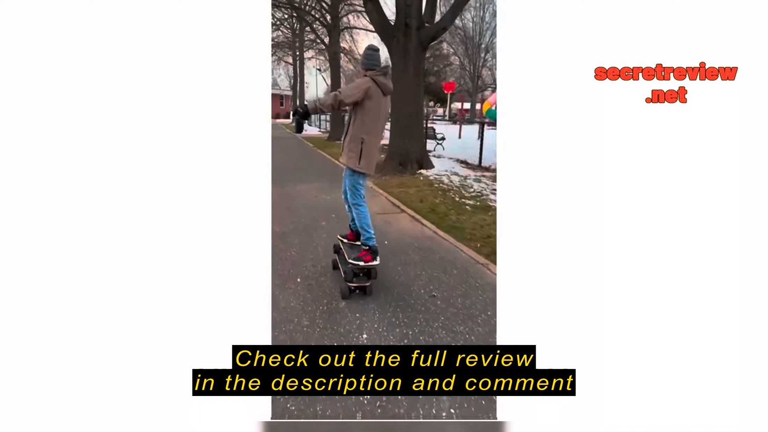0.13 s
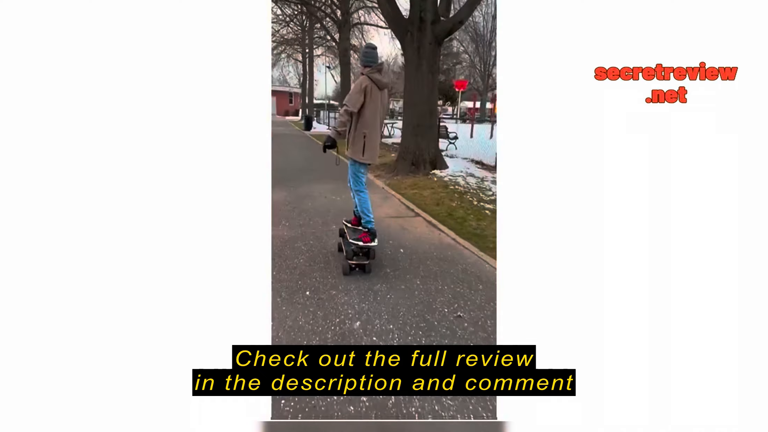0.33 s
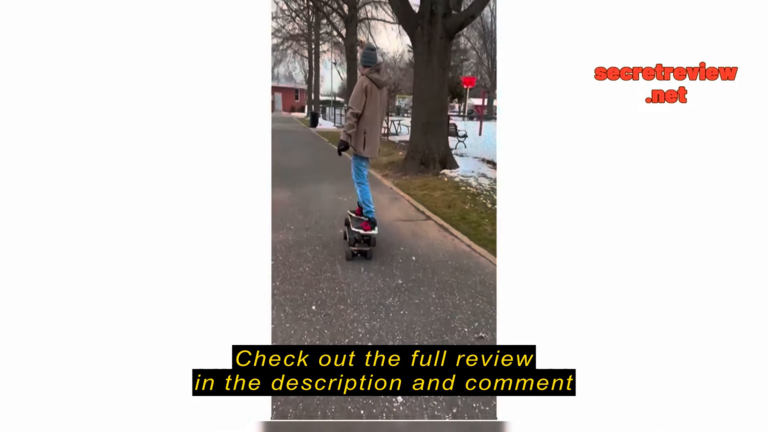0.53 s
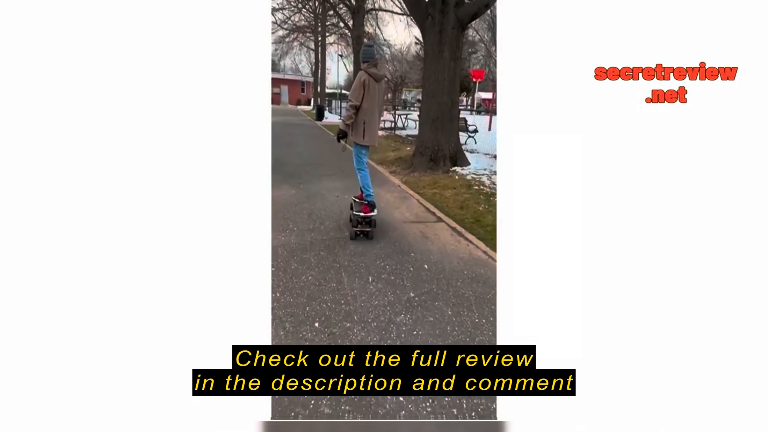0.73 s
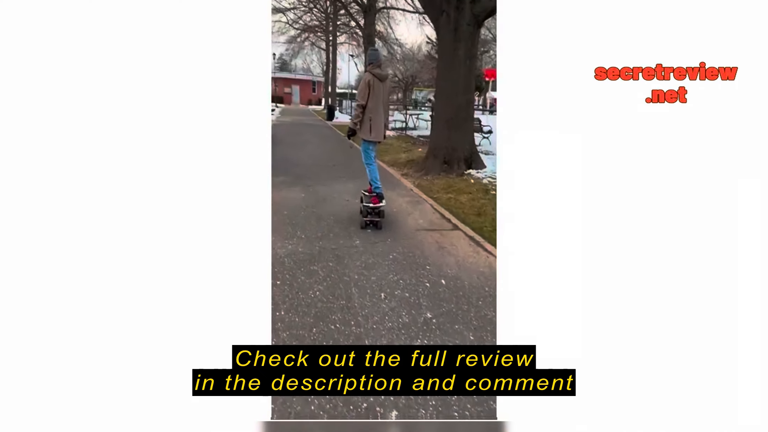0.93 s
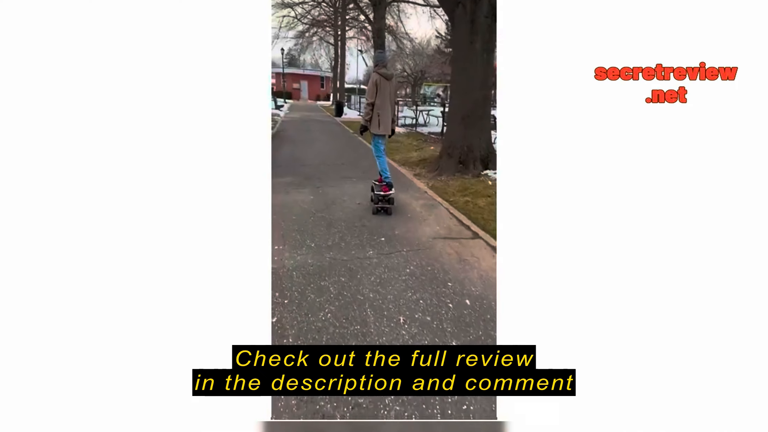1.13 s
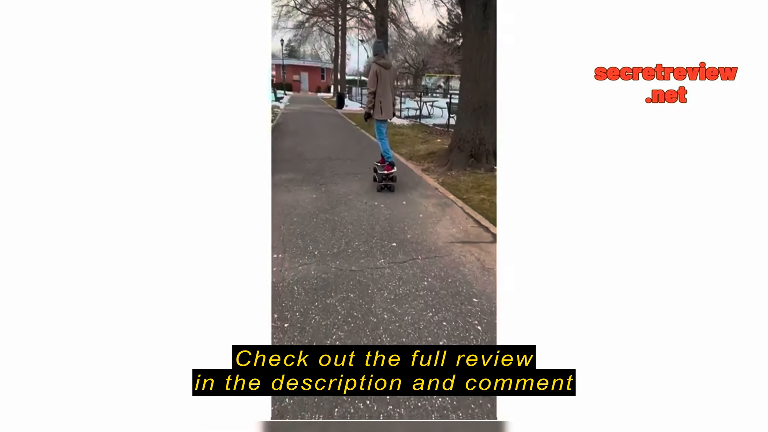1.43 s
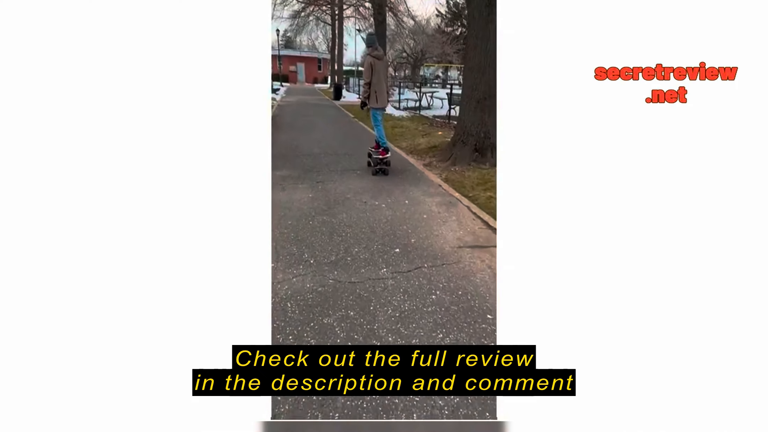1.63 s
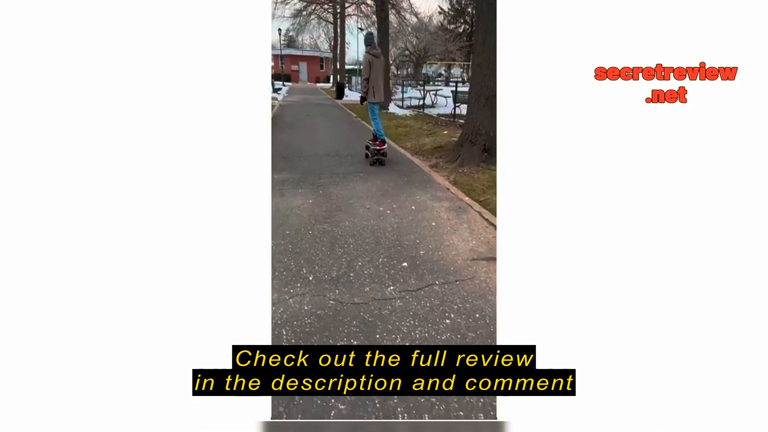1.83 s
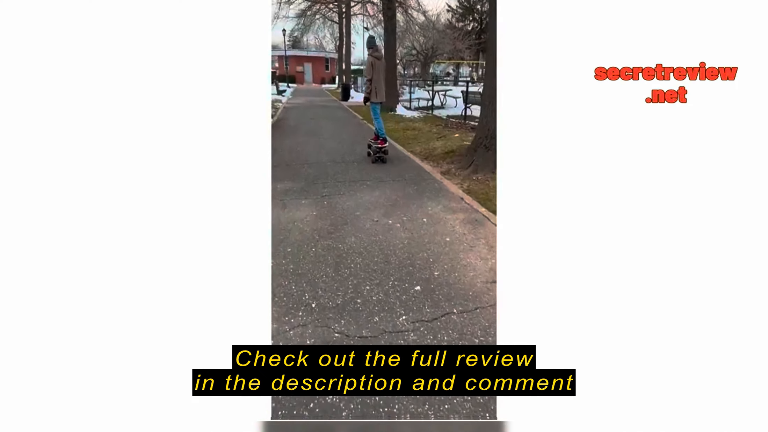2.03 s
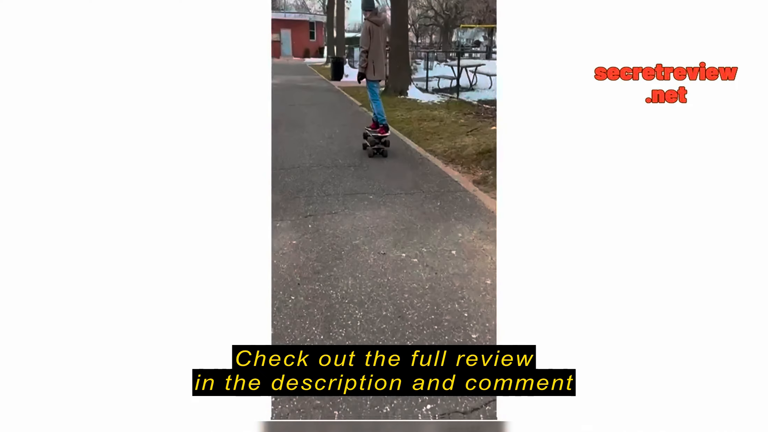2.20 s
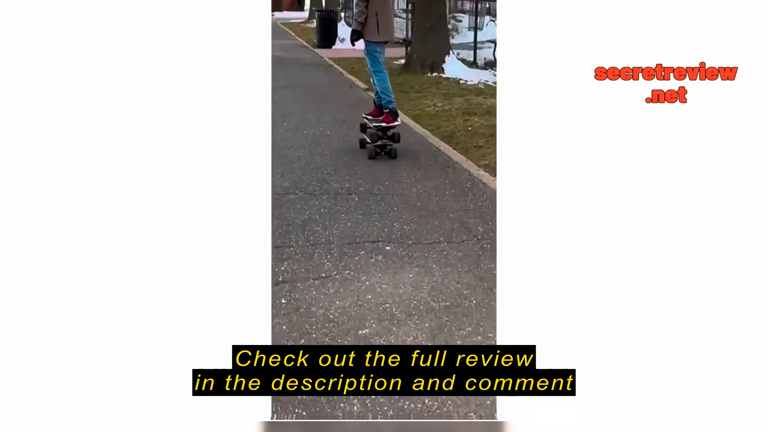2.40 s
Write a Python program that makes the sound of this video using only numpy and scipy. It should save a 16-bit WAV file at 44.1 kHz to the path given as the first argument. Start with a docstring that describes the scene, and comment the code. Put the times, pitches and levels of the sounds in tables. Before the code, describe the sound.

Skateboard wheels rumble over gritty pavement under gusty microphone wind, with small clicks and hollow deck knocks

```python
"""Wind buffets two microphone ports throughout, strongest early on, over thin hiss and a skateboard's roar.
The board rolls on a paved park path: noisy bumps excite deck resonances, a dull drone on the left.
Grit ticks nearby, each grain a noise snap with a short ping, and the deck gives brief hollow knocks.
Later a heel crunches on the grit, noise puffs with ringing tones, and scuffs in swelling bands of noise."""
import sys
import numpy as np
from scipy import signal
from scipy.fft import rfft, irfft, next_fast_len
from scipy.io import wavfile

SR = 44100
rng = np.random.default_rng(int(sys.argv[2]) if len(sys.argv) > 2 else 0)


def generate_wav(signal):
    """Clip the signal to [-1, 1] and save it as 16-bit WAV at the path in sys.argv[1]."""
    frames = np.transpose(np.atleast_2d(signal))
    scaled = np.clip(frames, -1, 1) * 32767
    pcm = np.round(scaled).astype(np.int16)
    wavfile.write(sys.argv[1], SR, pcm)


N = 112896   # 2.56 s

# wind pressure on the ports: start_s, common_level_db, common_upper_db (relative to its low part),
# common_deep_db (likewise), opposed_db (relative to common), opposed_upper_db (relative to its low part)
WIND = [(0.0, -36, -1, -12, 2.5, -8), (0.22, -26.5, -7.5, -26, -20.5, 4), (0.28, -31, -2.5, -32, -15, 1.5),
        (0.39, -32.5, -7, -15, -22, 2), (0.42, -34.5, -0.5, -19, -18, 1), (0.45, -34, -3.5, -5, -13, 1),
        (0.54, -34, -6, -16, -7.5, -9), (0.61, -35, -7.5, 5, -31, 11), (0.69, -35.5, -3.5, -43, -9.5, -2),
        (0.81, -32, -7.5, -19, -0.5, -13), (0.9, -40, 3.5, 1.5, -0.5, -5),
        (1.01, -41, -4.5, -6.5, 12, -4.5), (1.04, -38.5, -10, -12, 8, -1), (1.08, -42.5, -36, -6, 15.5, -5),
        (1.13, -31.5, -3.5, -7.5, -7, -6), (1.2, -45, -7, -1, -10, -13), (1.85, -42.5, -4, -1.5, -1, -5),
        (2.05, -54.5, -8, -11, 12.5, 1.5), (2.08, -40, -12.5, -30, 3, -6), (2.12, -40, -6, -10, 1, -3),
        (2.33, -37, -8.5, -11, -6, -12), (2.47, -36.5, -25, -13, 0, -6), (2.5, -41.5, -11, -12, 14, -19),
        (2.56, -36.5, -7, 5, -1, -7)]
# spectra of the wind's low, upper common, upper opposed and deepest parts: frequency_hz, density_db
WIND_LOW = [(70, -15), (100, -4), (150, 1.5), (220, 0.5), (300, -10.5), (400, -39)]
WIND_HIGH = [(160, -34), (270, -2), (387, 0), (427, -10.5), (553, -9.5), (586, -16), (621, -31), (701, -43),
             (863, -15.5), (1020, -21.5), (1260, -37), (1500, -30), (1950, -53), (3300, -120)]
OPPOSED_HIGH = [(160, -32), (270, -5), (400, -3.5), (600, -2), (800, -16), (1000, -15), (1250, -32),
                (1950, -57), (3300, -120)]
WIND_DEEP = [(18, -43), (30, -24), (50, 4.5), (75, 6), (100, -4), (140, -34)]
# deepest opposed pressure, added on its own: start_s, level_db
DEEP_OPPOSED = [(0, -41), (.2, -45), (.4, -39), (.56, -63), (.72, -39), (.9, -36), (1.1, -51), (1.4, -37),
                (1.68, -47), (1.84, -39), (2.0, -45), (2.3, -40), (2.5, -27), (2.56, -30)]
# single pushes of wind: centre_s, level_db, pitch_hz
THUMPS = [(0.174, -13.5, 170), (0.2146, -16, 206), (0.311, -19, 131), (0.388, -13, 135), (1.04, -28, 118),
          (1.116, -24, 102), (1.127, -28, 700), (1.1277, -23.5, 368), (1.1304, -21, 332),
          (1.575, -27, 71.7), (1.708, -28.5, 86.5), (1.931, -28, 153), (2.08, -28, 220)]
# low buffeting note, the same at both ports: start_s, pitch_hz, level_db
BUFFET = [(0, 149, -47), (.1, 166.3, -34.5), (.2, 190.3, -41), (.27, 139.9, -31.5), (.34, 127.4, -27),
          (.47, 131.3, -30.5), (.6, 115.2, -32.5), (.73, 109.1, -38.5), (.83, 136.5, -29),
          (.95, 132.1, -69), (1.04, 109.6, -36.5), (1.13, 103, -29.5), (1.22, 110, -47),
          (2.2, 148.6, -44.5), (2.4, 110.9, -37.5), (2.56, 96.6, -36)]
WIND_LUMP_DB, WIND_LUMP_HZ = 2, 20.0
THUMP_CYCLES = 1   # envelope scale, in cycles of the push
BUFFET_DRIFT_HZ = 11

# fine grit and air hiss: start_s, level_db, common_middle_db and opposed_middle_db (extra near 3 kHz)
HISS = [(0.0, -45.5, 1, 3), (0.43, -52, 0.6, 1), (0.57, -51, 2, 1.5), (0.91, -47, -1.2, 2),
        (1.1, -48.5, -1, 0), (1.49, -53, 0.5, 3), (1.77, -52, 1.5, 3), (1.85, -57, -2, 9), (1.9, -49, 3, 4),
        (1.95, -52.5, -9.5, 3), (2.16, -55.5, 2.5, 5.5), (2.37, -59, -6, 9.5), (2.56, -54, -7.5, 6)]
# hiss spectrum: frequency_hz, density_db
HISS_COLOUR = [(710, 10), (1200, -9), (1480, -7.5), (1920, -8.5), (2270, -5.5), (2830, -6.5), (4040, -5.5),
               (4850, -10.5), (6110, -7.5), (7930, -6), (9250, -10.5), (10800, -26), (12000, -54.5),
               (15600, -88), (22000, -120)]
# tilt of the hiss unrelated at the two ports: frequency_hz, gain_db
HISS_APART = [(1200, -2), (1900, -6), (2500, 3), (3400, 2), (4000, -3), (4800, 2), (6000, 0), (9000, -2),
              (12000, -4)]
# bands of hiss that flicker alone: low_hz, high_hz
HISS_BANDS = [(1000, 2400), (2400, 3600), (3600, 5200), (5200, 7600), (7600, 13000)]
HISS_FLICKER_DB, HISS_FLICKER_HZ = 3, 17
HISS_PATCH_DB, HISS_PATCH_HZ = 1.3, 11.3
HISS_APART_SHARE, HISS_TOP_HZ = 1.3, 9900
CRACKLE_PER_S, CRACKLE_DB = 260, -59.5
CRACKLE_SNAP = 1.2   # noise puffs against pings

# board rolling: start_s, drone_level_db, roar_level_db, drone_left_over_right_db
ROLL = [(0, -50, -51, 17), (.15, -52, -51, 27), (.5, -46.5, -49, 26), (.85, -44, -59, 27),
        (.98, -39.5, -49, 14), (1.02, -45, -54, 8), (1.095, -47, -65, 15), (1.13, -42.5, -47.5, 28),
        (1.5, -44, -48, 39), (1.8, -41.5, -44.5, 15), (1.88, -38.5, -52, 20), (1.93, -43, -45, 20),
        (2.0, -38.5, -49, 23), (2.07, -40.5, -47, 19), (2.13, -39, -50.5, 16), (2.25, -44, -48, 16),
        (2.4, -39, -52, 6), (2.48, -37.5, -53.5, 8), (2.56, -44, -57, 14)]
# deck resonances: pitch_hz, width_hz, relative_gain_db
DECK = [(580.3, 5.6, 12.5), (606, 40, 19), (667, 30, -7)]
# wheel roar spectrum: frequency_hz, density_db
ROAR = [(180, -44), (300, -2.5), (355, 5.5), (406, -24), (451, 0.5), (584, -2.5), (855, -2.5), (1140, -9),
        (2500, -22), (3250, -68), (5500, -120)]
BUMPS_PER_S, BUMP_SPREAD_DB = 900, 3.5
ROAR_APART = 0.76   # share of roar unrelated at the two ports

# grit ticks: start_s, level_db, ping_pitch_hz, ping_db (relative), snap_brightness (0 to 1)
TICKS = [(0.0156, -26.5, 3440, -9.5, 1), (0.0304, -53, 2600, 12, 0.2), (0.0883, -36.5, 2270, -8, 0.1),
         (0.115, -31.5, 3540, -1.5, 0.2), (0.1433, -33, 3470, -3.5, 0.3), (0.1524, -29.5, 3200, -15, 0.1),
         (0.189, -28.5, 2900, -21, 0.24), (0.225, -33.5, 2180, -10, 0.2), (0.2592, -22, 2900, -8, 0.2),
         (0.2714, -32, 7520, 0, 0.04), (0.2756, -27.5, 4380, -7, 0.03), (0.3057, -60, 2180, -17, 0.4),
         (0.3703, -30, 2200, -17, 0.35), (0.387, -30.5, 6040, -2, 0.5), (0.394, -28, 2680, -17, 0.5),
         (0.4747, -30, 9450, -2, 0.1), (0.4847, -34, 3630, -5.5, 0.1), (0.514, -34, 2370, -7, 0.2),
         (0.537, -33, 4100, -6, 0.1), (0.5945, -37.5, 2817, -3.5, 0.5), (0.6095, -32.5, 4070, -1, 0.2),
         (0.6677, -31, 4020, -4, 0.3), (0.6837, -31, 3863, -3.5, 0.5), (0.7078, -19, 6870, -19, 0.64),
         (0.7172, -27, 3580, -18, 0.2), (0.7322, -31, 5800, -4, 0.04), (0.7549, -33.5, 6680, 2.5, 0.2),
         (0.7809, -34, 4240, 1, 0.6), (0.7913, -13, 4660, -16.5, 0.39), (0.8068, -25, 6200, -20, 0.5),
         (0.8307, -31, 5890, -2, 0.21), (0.8644, -25.5, 7300, -9, 0.97), (0.8904, -49, 2135, 3, 0.44),
         (0.9188, -29.5, 2760, -11.5, 0.5), (0.9282, -29.5, 5720, -5.5, 0.5),
         (0.9325, -21.5, 7830, -13.5, 0.6), (0.9709, -44, 3930, 0, 0.1), (0.9926, -30, 3830, -17, 0.46),
         (1.0047, -26, 1980, -36, 0.25), (1.0252, -28.5, 6900, -7, 0.3), (1.047, -28, 2620, -13, 0.37),
         (1.067, -40, 2750, -2, 0), (1.0803, -24, 2630, -28, 0.17), (1.0938, -39, 5860, 6.5, 0.4),
         (1.123, -34.5, 5830, 5, 0.2), (1.1362, -30, 3050, -6, 0.33), (1.1483, -32, 6000, -7.5, 0.3),
         (1.1566, -28, 5900, -10, 0.4), (1.18, -30, 3390, -8, 0), (1.2104, -41.5, 3720, 0.5, 0.46),
         (1.262, -54.5, 3565, 10, 0.55), (1.3304, -43, 3800, 0, 0.2), (1.3664, -42.5, 3660, 0.5, 0.7),
         (1.3931, -29.5, 3960, -10.5, 0.48), (1.4151, -52, 5980, 7, 0.49), (1.4276, -30.5, 3500, -14, 0),
         (1.461, -26.5, 4150, -19, 0.57), (1.5211, -45, 2154, -1, 0.3), (1.6422, -27.5, 2100, -20, 0.37),
         (1.654, -26, 3900, -19, 0.4), (1.9127, -20.5, 9140, -15, 0.74), (1.9672, -39, 7120, -8, 1),
         (2.0022, -33, 8760, -10, 0.46), (2.0655, -33, 3263, -15, 0.43), (2.1474, -46, 2038, -2, 0.47),
         (2.185, -40, 4400, -18, 0.18), (2.2104, -24.5, 9000, -17, 0.9), (2.3045, -34, 4715, -12, 0.3),
         (2.3673, -29.5, 2190, -34, 0.6), (2.4212, -33, 9000, -8, 0.7)]
PING_WIDTH_S, OVERTONE_RATIO, OVERTONE_DB = 0.0013, 2.4, -7
SNAP_T60_S, SNAP_LOW_HZ, SNAP_RISE_S = 0.042, 1310, 0.00036
SNAP_GAIN, SNAP_APART = 0.46, .8   # all snap noise, and the share unrelated at the two ports
CRACK_DB, CRACK_S = 2, .0025   # a snap starts with a short, louder crack
TICK_TOP_HZ = 10000

# small knocks of the deck over bumps: time_s (the note starts two rise times before it),
# level_db (before KNOCK_GAIN_DB), pitch_hz
KNOCKS = [(.149, -25.5, 553), (0.189, -34.5, 1014), (.449, -33.5, 1010), (.752, -31, 610), (1.99, -32, 622),
          (2.03, -28, 593), (2.153, -33, 609)]
KNOCK_RISE_S, KNOCK_T60_S = 0.00195, 0.05
KNOCK_GAIN_DB, KNOCK_LEFT_OVER_RIGHT_DB = 4.0, 15

# heel crunching on grit: start_s, level_db, low_edge_hz, t60_s
CRUNCH = [(1.559, -31, 890, 0.015), (1.568, -30, 480.5, 0.025), (1.7152, -20.5, 2070, 0.028),
          (1.7208, -18.5, 480, 0.024), (1.7262, -26, 485.4, 0.014), (1.7325, -24.5, 2490, 0.023),
          (1.737, -33, 1502, 0.063)]
# tones of the sole: pitch_hz, relative_db, t60_s
HEEL = [(523, -8.5, 0.021), (854, 0, 0.024), (1675, 5.5, 0.0053), (2900, -9, 0.018)]
# scuff bands: centre_hz, width_hz, level_db; the second swells more steeply with the stroke
SCUFF_BANDS = [(4130, 540, -50), (4660, 610, -49.5)]
HEEL_RISE_S, HEEL_RING_GAIN = 0.00081, 1.05
SCUFF_S, SCUFF_PEAK_S, SCUFF_END_S = 1.745, 1.845, 1.917

# phase between the two ports for airborne sound: frequency_hz, left_lead_rad
PORT_PHASE = [(0, 0), (700, .9), (1400, .2), (2300, 0), (2900, -1.6), (3400, -1.1), (3950, .1), (4600, -1),
              (5500, -1.8), (7300, -1), (8500, -1.6), (10000, -2.4), (11500, -1.9)]
MIC_CUTOFF_HZ, MIC_STOP_HZ = 10900, 12500


def from_db(db):
    """Decibels to gain."""
    return 10 ** (np.asarray(db) / 20)


def rms_one(x):
    """Scale to rms 1."""
    return x / np.sqrt(np.mean(x ** 2) + 1e-20)


def in_time(rows):
    """Columns of a curve interpolated at every sample."""
    s, *columns = np.transpose(rows)
    return [np.interp(np.arange(N) / SR, s, c) for c in columns]


def coloured(x, points):
    """Shape a noise by a (Hz, dB) curve, straight over log frequency; rms 1."""
    hz, db = np.transpose(points)
    f = np.maximum(np.fft.rfftfreq(N, 1 / SR), 1)
    gain_db = np.interp(np.log(f), np.log(hz), db, left=-90, right=-90)
    return rms_one(irfft(rfft(x) * from_db(gain_db), N))


def drift(rate_hz):
    """Slow random wander: noise through two equal low-pass poles, rms 1."""
    r = np.exp(-2 * np.pi * rate_hz / SR)
    settled = signal.lfilter([1], [1, -2 * r, r * r], rng.standard_normal(N + SR))[SR:]
    return rms_one(settled)


def resonance(x, hz, width_hz):
    """One two-pole resonance, about gain 1 on top."""
    r = np.exp(-np.pi * width_hz / SR)
    poles = [1, -2 * r * np.cos(2 * np.pi * hz / SR), r * r]
    return signal.lfilter(np.array([1, 0, -1]) * (1 - r * r) / 2, poles, x)


def grains(per_s, spread_db):
    """Random clicks of uneven size and either sign."""
    struck = rng.random(N) < per_s / SR
    size = from_db(spread_db * np.minimum(rng.exponential(1, N), 4))
    return struck * size * rng.choice([-1, 1], N)


def burst(noise, low_hz, t60):
    """A short dying puff of high-passed noise, peak 1."""
    t = np.arange(len(noise)) / SR
    high_pass = signal.butter(2, low_hz, "high", fs=SR, output="sos")
    x = signal.sosfilt(high_pass, noise) * from_db(-60 * t / t60)
    return x / np.abs(x).max()


def add(out, s, sound):
    """Mix a sound in at a time."""
    i = int(s * SR)
    out[i:i + len(sound)] += sound[:N - i]


def two_ports(x):
    """One airborne sound as the two ports catch it, shifted in phase."""
    hz, lead = np.transpose(PORT_PHASE)
    size = next_fast_len(N + 2048)
    half_turn = np.exp(.5j * np.interp(np.fft.rfftfreq(size, 1 / SR), hz, lead))
    spectrum = rfft(x, size)
    left = irfft(spectrum * half_turn, size)[:N]
    right = irfft(spectrum / half_turn, size)[:N]
    return np.array([left, right])


def lumpy_pressure(level_db, parts):
    """Wind pressure: low noise plus further coloured parts, all swelling in lumps."""
    noise = sum(from_db(db) * coloured(rng.standard_normal(N), colour)
                for db, colour in [(0, WIND_LOW), *parts])
    return noise * from_db(level_db + WIND_LUMP_DB * drift(WIND_LUMP_HZ))


def buffet():
    """A narrow band of noise: two slow drifts on a carrier whose pitch moves."""
    hz, db = in_time(BUFFET)
    turn = 2 * np.pi * np.cumsum(hz) / SR
    band = drift(BUFFET_DRIFT_HZ) * np.cos(turn) + drift(BUFFET_DRIFT_HZ) * np.sin(turn)
    return from_db(db) * rms_one(band)


def pushes():
    """Single pushes of wind: about one sine cycle under a bell envelope."""
    t, out = np.arange(N) / SR, 0
    for s, db, hz in THUMPS:
        bell = np.exp(-((t - s) * hz / THUMP_CYCLES) ** 2 * 2)
        out = out + from_db(db) * np.sin(2 * np.pi * hz * (t - s)) * bell
    return out


def wind():
    """Gusts press the ports partly together, partly in opposition, with a buffeting note and pushes."""
    level_db, upper_db, deep_db, opposed_db, opposed_upper_db = in_time(WIND)
    common = lumpy_pressure(level_db, [(upper_db, WIND_HIGH), (deep_db, WIND_DEEP)])
    opposed = from_db(opposed_db) * lumpy_pressure(level_db, [(opposed_upper_db, OPPOSED_HIGH)])
    deepest_db, = in_time(DEEP_OPPOSED)
    opposed = opposed + from_db(deepest_db) * coloured(rng.standard_normal(N), WIND_DEEP)
    return common + opposed * [[1], [-1]] + buffet() + pushes()


def crackle():
    """Faint random clicks, each ringing at one of 14 pitches and opening a tiny noise puff."""
    clicks, dealt = grains(CRACKLE_PER_S, 3.0), rng.integers(0, 14, N)
    pings = sum(resonance(resonance(clicks * (dealt == k), hz, 150.0), hz, 290.0)
                for k, hz in enumerate(np.geomspace(2200, 9200, 14)))
    decay = np.exp(-1 / (0.0033 * SR))   # 3.3 ms
    puffs = signal.lfilter([1], [1, -decay], np.abs(clicks)) * rng.standard_normal(N)
    return rms_one(pings) + CRACKLE_SNAP * coloured(puffs, HISS_COLOUR)


def hiss():
    """Patchy fine noise of grit and air, partly unrelated at the two ports, with faint crackle."""
    level_db, common_middle_db, opposed_middle_db = in_time(HISS)
    faint = crackle()
    apart = coloured(rng.standard_normal((2, N)), HISS_COLOUR)
    apart = coloured(apart, [(30, -9), *HISS_APART, (22050, -9)])
    ports = two_ports(coloured(rng.standard_normal(N), HISS_COLOUR)) + HISS_APART_SHARE * apart
    sides = np.array([ports[0] + ports[1], ports[0] - ports[1]])   # common, opposed
    middle_db = np.array([common_middle_db, opposed_middle_db])
    patchy = np.zeros((2, N))
    for k, band in enumerate(HISS_BANDS):
        gain_db = HISS_PATCH_DB * drift(HISS_PATCH_HZ) + (k == 1) * middle_db
        band_pass = signal.butter(2, band, "band", fs=SR, output="sos")
        patchy += from_db(gain_db) * signal.sosfilt(band_pass, sides)
    common, opposed = patchy
    ports = common + opposed * [[1], [-1]]
    ports = signal.sosfilt(signal.cheby1(10, 1, HISS_TOP_HZ, fs=SR, output="sos"), ports)
    steady = from_db(level_db + HISS_FLICKER_DB * drift(HISS_FLICKER_HZ)) * rms_one(ports)
    # crackle follows the hiss level around its mean
    return steady + two_ports(from_db(level_db - level_db.mean() + CRACKLE_DB) * faint)


def rolling():
    """Bumps of the paving shake the deck's resonances and make a broad roar."""
    drone_db, roar_db, pan_db = in_time(ROLL)
    bumps = grains(BUMPS_PER_S, BUMP_SPREAD_DB)
    drone = rms_one(sum(from_db(db + 2.0 * drift(4.2)) * resonance(bumps, hz, width)
                        for hz, width, db in DECK))
    drone_ports = from_db(drone_db) * drone * from_db(np.array([0 * pan_db, -pan_db]))
    roar = two_ports(coloured(bumps + 0.5 * rng.standard_normal(N), ROAR))
    roar = roar + ROAR_APART * coloured(rng.standard_normal((2, N)), ROAR)
    roar_ports = from_db(roar_db + 2.3 * drift(40)) * roar * from_db([[1.5], [-1.5]])   # left 3 dB up
    return drone_ports + roar_ports


def ticks():
    """Each grain gives a broad snap, partly unrelated at the ports, and a brief rounded two-tone ping."""
    length = 1500
    out, t = np.zeros((3, N)), np.arange(length) / SR   # rows: shared, left only, right only
    rise = np.minimum(t / SNAP_RISE_S, 1)
    crack = from_db(CRACK_DB * np.exp(-(t / CRACK_S) ** 2))
    noises = rng.standard_normal((len(TICKS), 3, length))
    for (s, db, hz, ping_db, bright), noise in zip(TICKS, noises):
        tone = np.sin(2 * np.pi * hz * t)
        overtone = from_db(OVERTONE_DB) * np.sin(2 * np.pi * OVERTONE_RATIO * hz * t)
        ping = (tone + overtone) * np.exp(-(t / PING_WIDTH_S - 1.3) ** 2)
        tilt = np.clip(2 * bright - 1, -.9, .95)   # above 0 thins the bass, below 0 dulls the treble
        for k, share in enumerate([1, SNAP_APART, SNAP_APART]):
            tilted = signal.lfilter([1, -max(tilt, 0)], [1, min(tilt, 0)], noise[k])
            snap = SNAP_GAIN * share * burst(tilted * rise * crack, SNAP_LOW_HZ, SNAP_T60_S)
            add(out[k], s, from_db(db) * (snap + (k == 0) * from_db(ping_db) * ping))
    low_pass = signal.butter(8, TICK_TOP_HZ, fs=SR, output="sos")
    return signal.sosfilt(low_pass, two_ports(out[0]) + out[1:])


def knocks():
    """Brief hollow notes from the deck: sines with a soft rise and a quick decay, stronger on the left."""
    out, t = np.zeros(N), np.arange(4000) / SR
    rise = 1 - np.exp(-t / KNOCK_RISE_S)
    for s, db, hz in KNOCKS:
        decay = from_db(db + KNOCK_GAIN_DB - 60 * t / KNOCK_T60_S)
        add(out, s - 2 * KNOCK_RISE_S, decay * rise * np.sin(2 * np.pi * hz * t))
    return out * from_db(np.array([[0], [-KNOCK_LEFT_OVER_RIGHT_DB]]))


def scuff():
    """The heel rubs the ground: two resonant noise bands that swell, then stop."""
    times = [SCUFF_S, SCUFF_S + .01, SCUFF_PEAK_S, SCUFF_END_S - .008, SCUFF_END_S]
    stroke = np.interp(np.arange(N) / SR, times, [0, .55, 1, .75, 0])
    rub = 0
    for k, (hz, width, db) in enumerate(SCUFF_BANDS):
        band = resonance(resonance(rng.standard_normal(N), hz, width), hz, width)
        rub = rub + from_db(db) * stroke ** k * rms_one(band)
    return from_db(0.57 * drift(50)) * stroke * rub


def heel():
    """Crunches that ring the sole's tones above their low edge, then a short scuff."""
    out, t = np.zeros(N), np.arange(4000) / SR
    rise = 1 - np.exp(-t / HEEL_RISE_S)
    for (s, db, low_hz, t60), noise in zip(CRUNCH, rng.standard_normal((len(CRUNCH), 4000))):
        ring = sum(from_db(tone_db - 60 * t / tone_t60) * np.sin(2 * np.pi * hz * t)
                   for hz, tone_db, tone_t60 in HEEL if hz > low_hz)
        add(out, s, from_db(db) * (burst(noise * rise, low_hz, t60) + HEEL_RING_GAIN * ring * rise))
    return out + scuff()


def scene():
    """All sources at the two ports."""
    return wind() + rolling() + hiss() + ticks() + two_ports(heel()) + knocks()


def record(dry):
    """The microphone rolls off in the top, then a steep cut."""
    soft = signal.sosfilt(signal.butter(6, MIC_CUTOFF_HZ, fs=SR, output="sos"), dry)
    return signal.sosfilt(signal.cheby2(12, 60, MIC_STOP_HZ, fs=SR, output="sos"), soft)


dry = scene()
out = record(dry)
generate_wav(out)
```